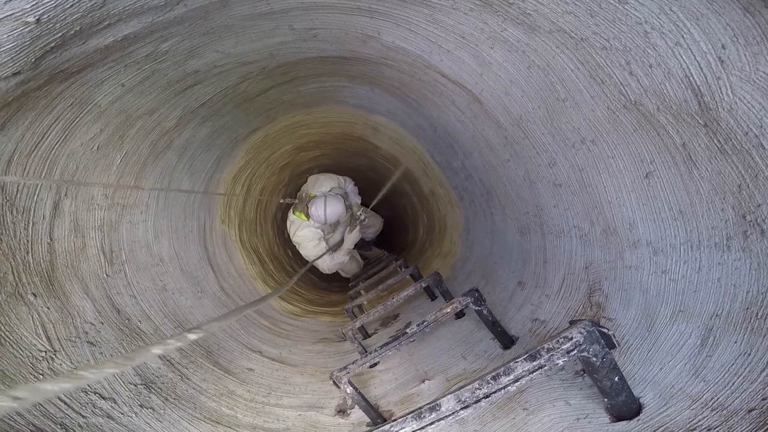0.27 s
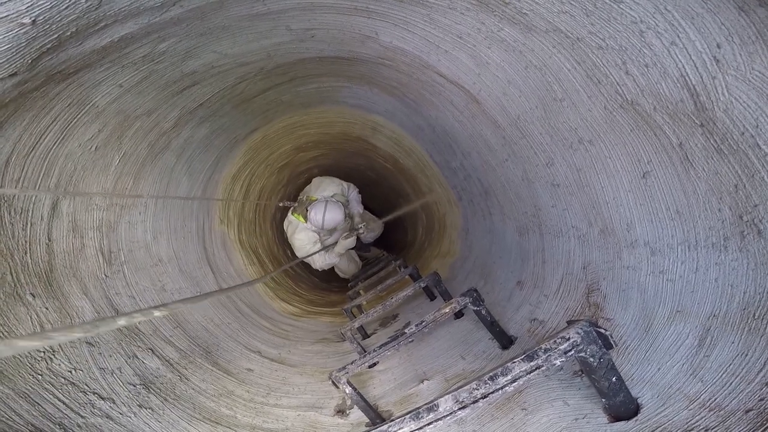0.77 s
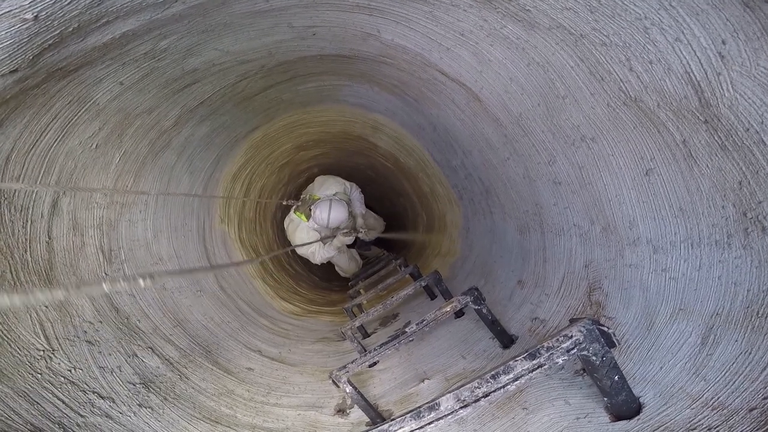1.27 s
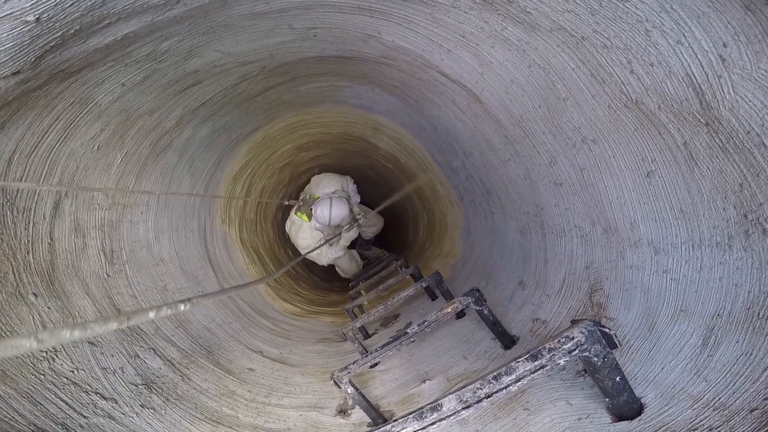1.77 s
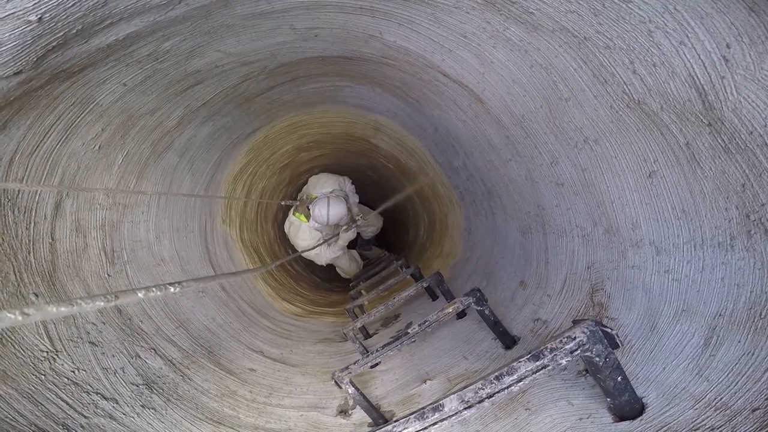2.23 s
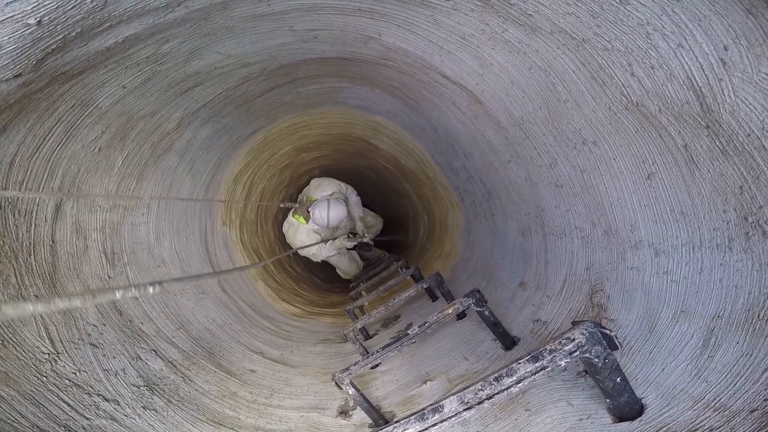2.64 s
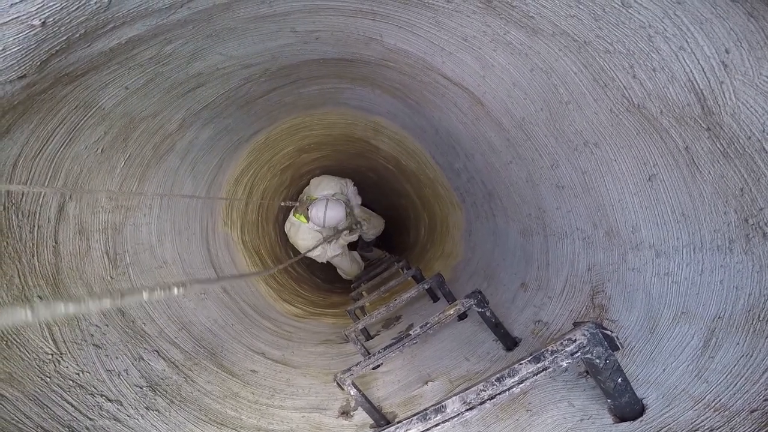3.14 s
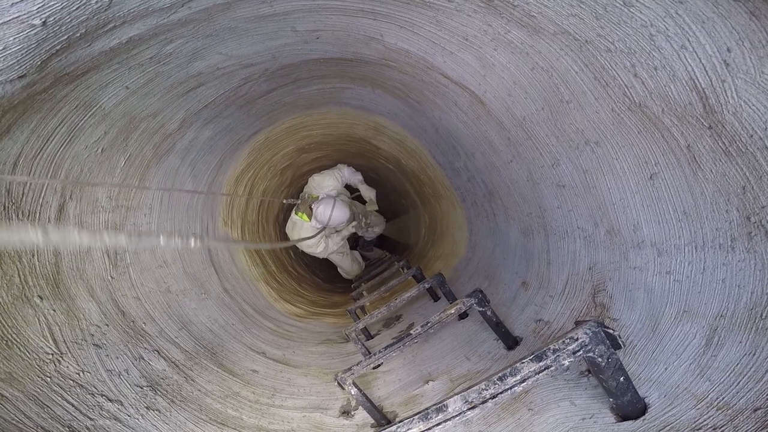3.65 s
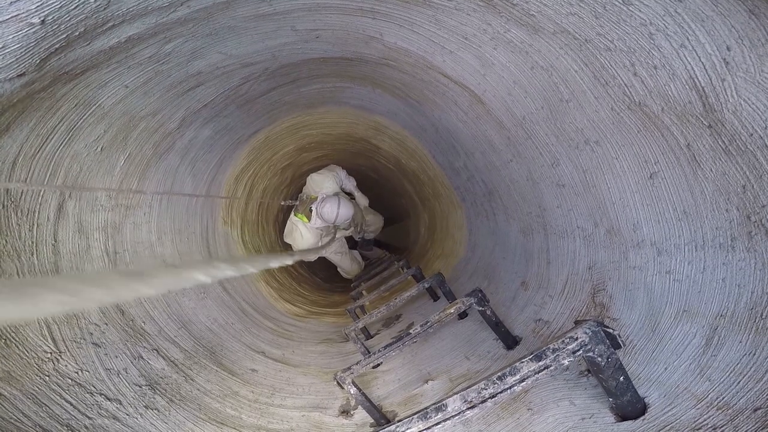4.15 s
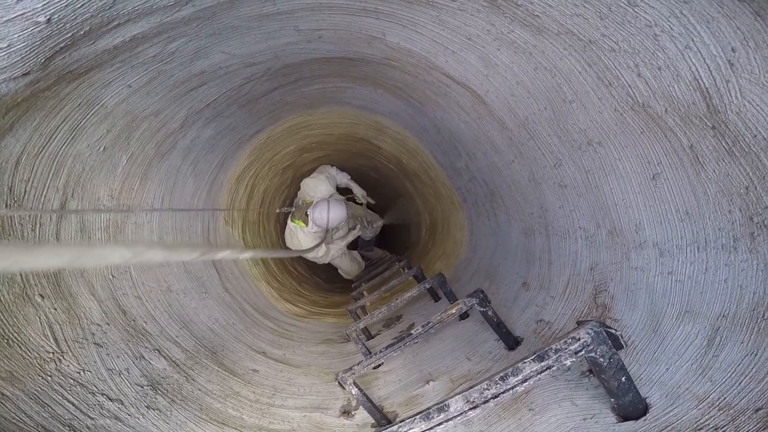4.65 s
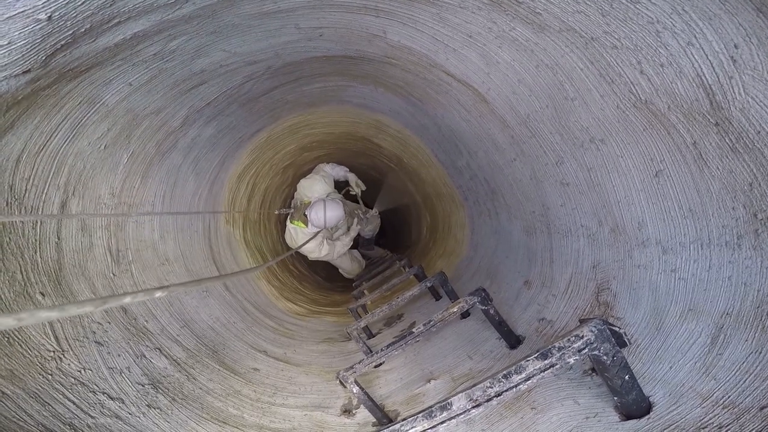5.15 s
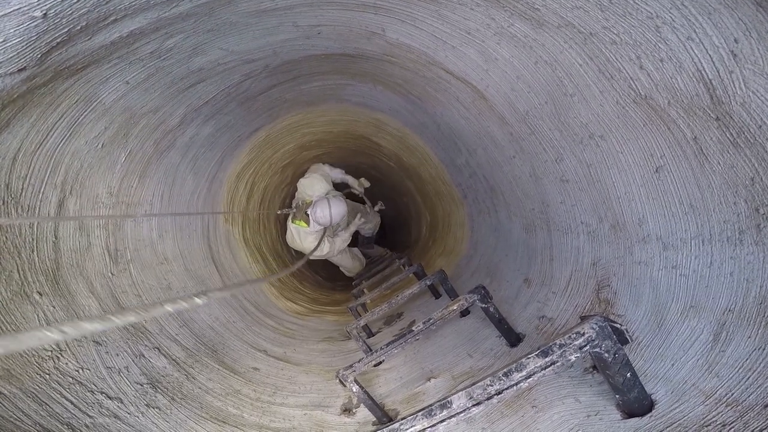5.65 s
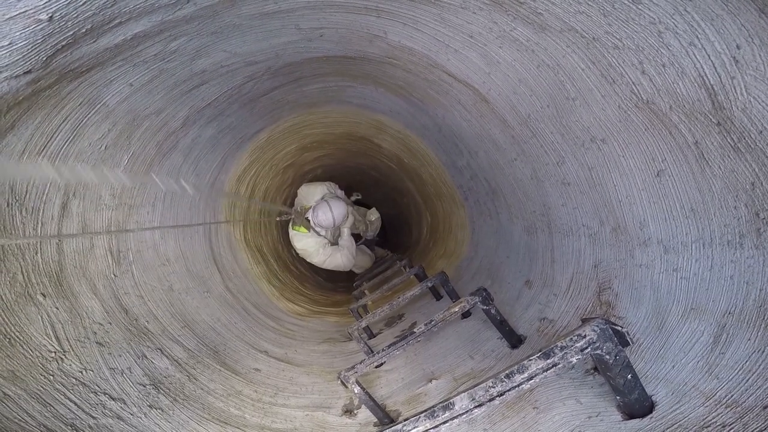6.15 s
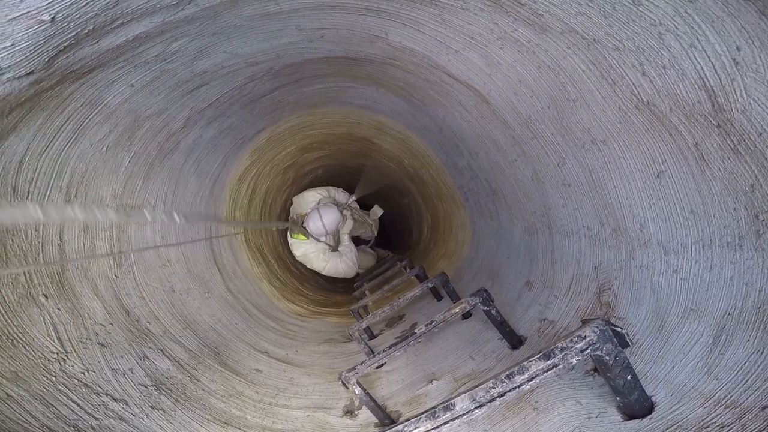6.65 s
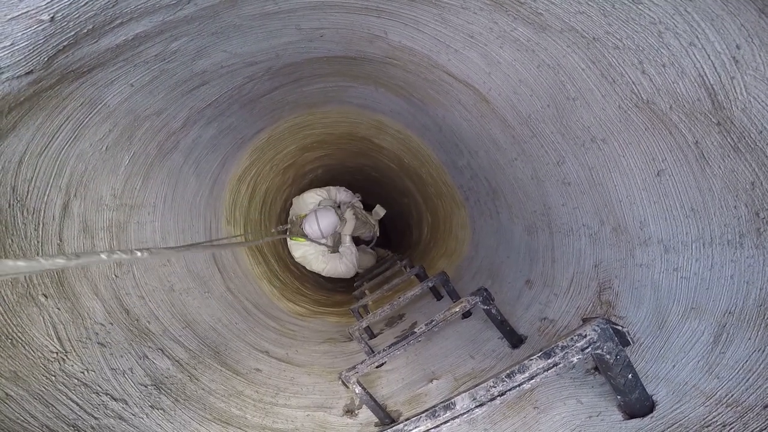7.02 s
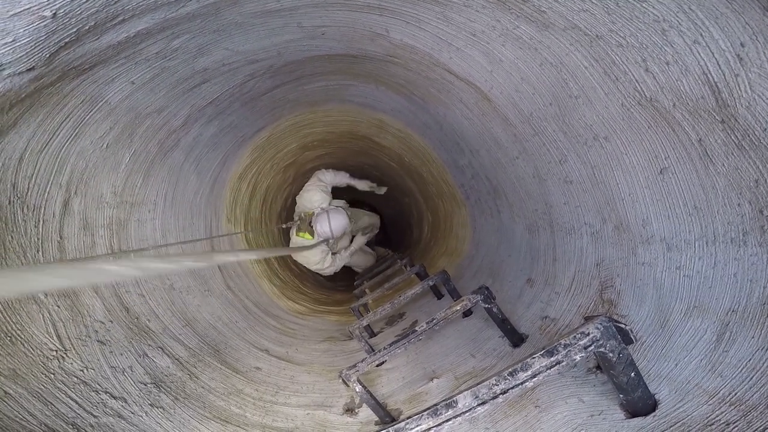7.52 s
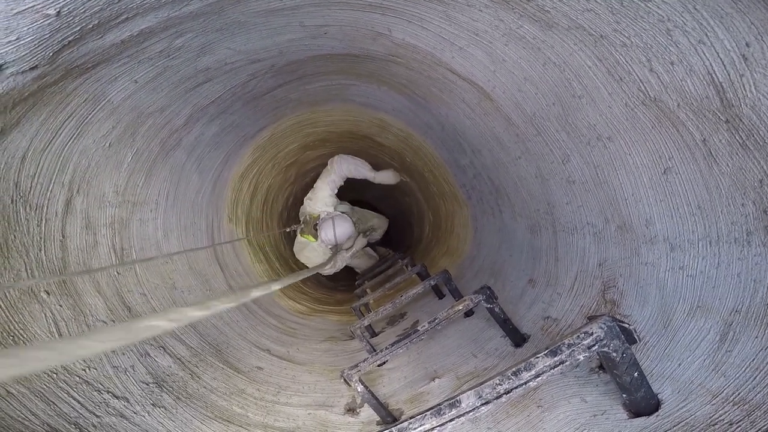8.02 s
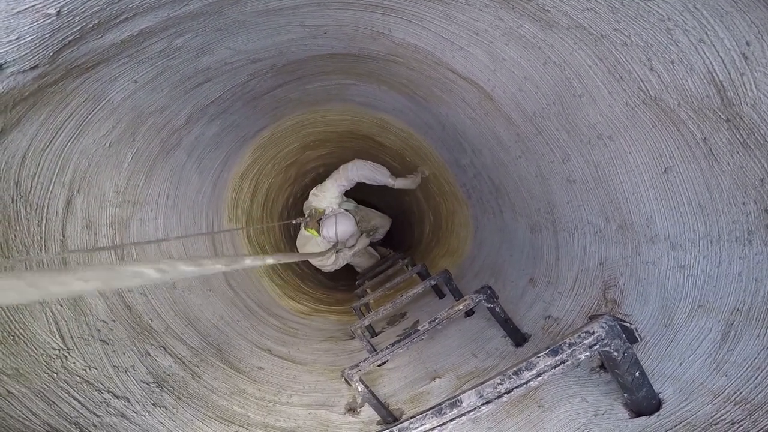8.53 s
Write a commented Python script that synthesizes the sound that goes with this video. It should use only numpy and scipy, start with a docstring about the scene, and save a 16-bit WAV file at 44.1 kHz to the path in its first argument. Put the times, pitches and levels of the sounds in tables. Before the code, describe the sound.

A strong, grainy spray hiss is already running, stops, returns for a brief burst, then a longer one with slight whistling and two dull thumps, and finally a short bright one. Constant faint air leakage fills the pauses. A low engine hum wavers in pitch beneath. Mono sound from above the shaft, close concrete reflections shifting the hiss's colour.

```python
"""Epoxy spraying in a concrete manhole

A worker sprays the manhole wall, heard in mono from the rim: filtered noise hisses in four passes, with
puffs, ticks, brief whistles and a constant thin air leak; drifting echoes of the shaft colour it all.
A nearby generator engine, summed from sine harmonics, drones and sags twice under load.
Below lie outdoor rumble (low noise) and a few dull thumps (decaying sines)."""
import sys
import numpy as np
from scipy import signal
from scipy.fft import rfft, irfft
from scipy.io import wavfile
from scipy.ndimage import uniform_filter1d, map_coordinates

SR = 44100
rng = np.random.default_rng(int(sys.argv[2]) if len(sys.argv) > 2 else 0)


def wrap_up_sound(samples):
    """Save the sound to the file named by the first command line argument, as 16-bit audio."""
    columns = np.atleast_2d(samples).T
    # keep every value between -1 and 1, then stretch to whole-number steps
    tamed = np.clip(columns, -1, 1)
    steps = np.round(tamed * 32767).astype(np.int16)
    wavfile.write(sys.argv[1], SR, steps)


N = 387638
TIME = np.arange(N) / SR
FREQS = np.maximum(np.arange(N // 2 + 1) * SR / N, 1)
TOP_HZ = 15350
# resonances and dips between gun and microphone: centre_hz, width_hz, gain_db
PATH_COLOUR = [(782, 170, 7), (1535, 80, 0.5), (1880, 350, 0.5), (2206, 140, -7), (3010, 243, 5.5),
               (3415, 316, 6.5), (3740, 175, -9.5), (3880, 560, 4.5), (5560, 630, 8), (6586, 1180, 7),
               (10160, 1330, 6.5), (12760, 1370, 6)]


def undb(db):
    """Decibels to gain."""
    return 10 ** (np.asarray(db) / 20)


def unit(x):
    """Scale to rms 1."""
    return x / np.sqrt(np.mean(x ** 2))


def walk(rate_hz):
    """Smooth random control from values redrawn at rate_hz; spread near 1."""
    k = max(int(SR / rate_hz), 2)
    held = np.repeat(rng.standard_normal(N // k + 1), k)
    smooth = uniform_filter1d(uniform_filter1d(held, k), k)
    return 1.343 * smooth[:N]


def swell(centre_s, length_s):
    """Gaussian rise and fall: 1 at its centre, 1/e at length_s either side."""
    return np.exp(-((TIME - centre_s) / length_s) ** 2)


def slope(points):
    """Spectrum in dB at every frequency, interpolated over log frequency."""
    hz, db = np.transpose(points)
    return np.interp(np.log(FREQS), np.log(hz), db)


def bumps(hz, modes):
    """Summed gain in dB of resonances at the given frequencies."""
    return sum(db / (1 + (2 * (hz - centre) / width) ** 2) for centre, width, db in modes)


def shape(x, db):
    """Filter by a gain in dB at every frequency."""
    return irfft(rfft(x) * undb(db), N)


def band(x, lo_hz, hi_hz):
    """The part of a sound between two frequencies."""
    return irfft(rfft(x) * ((FREQS >= lo_hz) & (FREQS < hi_hz)), N)


def noise(db):
    """Noise of rms 1 with the given spectrum."""
    return unit(shape(rng.standard_normal(N), db))


def ring(centre_hz, width_hz):
    """Noise of rms 1 in one steep resonance, with the path colour."""
    detune = (FREQS / centre_hz - centre_hz / FREQS) * centre_hz / width_hz
    return noise(bumps(FREQS, PATH_COLOUR) - 20 * np.log10(1 + detune ** 2))


def wall_echo(x, lag_s, sweep_s, share):
    """The wall returns the jet after a randomly drifting lag: a moving comb."""
    lag_samples = (lag_s + sweep_s * walk(2.2)) * SR
    return x + share * map_coordinates(x, [np.arange(N) - lag_samples], order=3)


def spits(per_s, boost_db, length_s):
    """Resin blobs break up at the nozzle: very short hiss surges, random in time and size."""
    hits = rng.random(N) < per_s / SR
    surges = hits * np.minimum(rng.exponential(size=N), 2.5)
    decay = np.exp(-1 / (length_s * SR))
    return undb(boost_db * signal.lfilter([1], [1, -decay], surges))


def trigger(opening_s, spurt_s, snap_db):
    """Nozzle flow for treble and lower hiss: snaps open with a spurt, bleeds away when shut."""
    # trigger pulls: opens_s, shuts_s, t60_s (after shutting), spurt_db, low_hiss_lift_db
    pulls = [(-0.1, 2.408, .22, 0, 0), (2.7, 3.106, .21, 1, 0), (3.401, 5.578, .35, 3, 0.3),
             (6.241, 6.994, .1, 2, 2)]
    flow = low_flow = 0
    for opens_s, shuts_s, t60_s, spurt_db, lift_db in pulls:
        age_s = np.maximum(TIME - opens_s, 0)
        shut_age_s = np.maximum(TIME - shuts_s, 0)
        surge_db = spurt_db * np.exp(-age_s / spurt_s) + snap_db * swell(opens_s + opening_s, 0.0019)
        pull = np.minimum(age_s / opening_s, 1) * undb(surge_db - 60 * shut_age_s / t60_s)
        flow = flow + pull
        low_flow = low_flow + pull * undb(lift_db)
    return flow, low_flow


def jet(flutter_db, low_flutter_db, high_trim_db):
    """Turbulent hiss of atomised resin: treble follows the aim fully, the coarse lower part less."""
    # treble level as the gun swings towards and away from the opening: time_s, level_db (before trim)
    aim_points = [(.5, -22), (.85, -25), (3.1, -25), (3.45, -22), (4.25, -24), (4.95, -19.5), (6.3, -21.5),
                  (6.65, -20)]
    # jet spectrum before path colour: pitch_hz, relative_density_db (per Hz)
    jet_spectrum = [(200, -38), (500, -30), (1100, -24), (1700, -10.5), (2800, -2), (4800, -1), (8500, 0.5),
                    (15000, -2)]
    reference_aim_db, low_hiss_db, low_follows = -25, -31.5, 0.59
    aim_db = np.interp(TIME, *np.transpose(aim_points))
    low_db = low_hiss_db + low_follows * (aim_db - reference_aim_db)

    hiss = noise(slope(jet_spectrum) + bumps(FREQS, PATH_COLOUR))
    hiss = wall_echo(hiss, lag_s=.0042, sweep_s=0.000276, share=0.057)
    low = unit(band(hiss, 0, 4520)) * undb(low_db + low_flutter_db * walk(45))
    # treble is beamed at the nearest wall: shorter lag, stronger echo
    high = wall_echo(band(hiss, 4500, TOP_HZ), lag_s=.0011, sweep_s=.00007, share=.15)
    high = unit(high) * undb(aim_db + high_trim_db)
    high = high * spits(per_s=12, boost_db=4.5, length_s=0.0017)

    flow, low_flow = trigger(opening_s=0.0062, spurt_s=0.035, snap_db=1)
    return (low * low_flow + high * flow) * undb(flutter_db * walk(110))


def leak(flicker_db):
    """Air escapes constantly, trigger pulled or not; at times it swells or brightens."""
    # swells: centre_s, length_s (centre to 1/e), rise_db, extra_treble_rise_db
    leak_swells = [(.3, 1.1, 7.5, 0), (3.3, 0.17, 2, 3.5), (5.954, 0.14, 4, 6.5), (8.0, 0.15, 0, 5)]
    # leak spectrum before path colour: pitch_hz, relative_density_db (per Hz)
    leak_spectrum = [(400, -16.5), (1100, -7), (1700, 1), (2800, 0.5), (4800, -11), (8500, -21),
                     (15000, -28.5)]
    level_db, treble_db = -52.5, -16  # treble relative to the lower band
    for centre_s, length_s, rise_db, treble_rise_db in leak_swells:
        level_db = level_db + rise_db * swell(centre_s, length_s)
        treble_db = treble_db + treble_rise_db * swell(centre_s, length_s)
    air = noise(slope(leak_spectrum) + bumps(FREQS, PATH_COLOUR))
    air = unit(band(air, 0, 7640)) + unit(band(air, 7570, TOP_HZ)) * undb(treble_db)
    return air * undb(level_db + flicker_db * walk(25))


def shaft(x, wet_db, sweep_hz):
    """Direct sound plus concrete shaft reverberation, its echo pattern turning as the gun moves."""
    t60_s, split_hz = .28, 6500
    t = TIME[:SR // 2]
    low_pass = signal.butter(2, split_hz, fs=SR)
    high_pass = signal.butter(2, split_hz, "high", fs=SR)
    turn = 2 * np.pi * np.cumsum(sweep_hz * undb(2.92 * walk(2.01))) / SR
    wet = 0
    for aim in range(4):
        low, high = rng.standard_normal((2, len(t)))
        tail = signal.lfilter(*low_pass, low) * undb(-60 * t / t60_s)
        # treble dies sooner
        tail += signal.lfilter(*high_pass, high) * undb(-60 * t / (0.68 * t60_s))
        # two quadrature pairs of patterns: constant total power
        share = np.cos(turn * np.sqrt(1 + aim // 2) + aim * np.pi / 2) / np.sqrt(2)
        wet = wet + signal.fftconvolve(x * share, tail / np.linalg.norm(tail))[:N]
    return (x + undb(wet_db) * wet) / np.sqrt(1 + undb(2 * wet_db))


def felt_load(response_s):
    """Load, 0-1, as felt by a part with a first-order lag."""
    # engine loads: on_s, off_s
    loads = [(-.02, .993), (4.716, 5.962)]

    def remaining(start_s):
        return np.exp(-np.maximum(TIME - start_s, 0) / response_s)

    return sum(remaining(off_s) - remaining(on_s) for on_s, off_s in loads)


def harmonics(base_hz, table, load, waver_db):
    """Sine lines of a turning part: shift with load, swell as they cross air column modes."""
    # shaft air column modes: centre_hz, width_hz, gain_db
    column_modes = [(70, 8, 3.5), (116.5, 7, 13), (243.5, 5, 5), (247, 2.5, -12), (371, 6, 8)]
    phase = 2 * np.pi * np.cumsum(base_hz * (1 + 0.00095 * walk(12))) / SR
    out = 0
    for multiple, db, load_db in table:
        k = round(multiple)
        mode_db = bumps(k * base_hz, column_modes)
        gain = undb(db + load * load_db + mode_db + waver_db * walk(9))
        out = out + gain * np.sqrt(2) * np.sin(k * phase + rng.uniform(0, 2 * np.pi))
    return out


def generator():
    """Load slows the engine; the governor responds late, so it races briefly when load drops off."""
    # engine lines: cycle_multiple (5 = firing rate), relative_level_db, full_load_change_db
    engine_orders = [(3, -21, 6), (5, 0.5, 1.5), (6, -25, -3), (7, -14, -2.5), (8, -15.5, -1),
                     (9, -16, -4.5), (10, -21, 4.5), (11, -16, -6), (13, -31, 2), (14, -31, -14),
                     (15, -35.5, 12), (18, -30.5, -5), (21, -43, -10), (29, -32.5, -2), (36, -35, -5),
                     (38, -46.5, 15)]
    # hum of a belt-driven part: harmonic, relative_level_db, full_load_change_db
    hum_harmonics = [(2, -15.8, -13), (3, -29.5, -9), (4, -32, -12), (6, -34.5, -0.5)]
    free_hz, sag_hz, governor_hz = 74.77, 7.72, 8.86  # firing rate: unloaded, lost to load, won back
    belt_ratio = 1.582  # hum fundamental / firing rate
    engine_db, load_rise_db = -41, 4.5
    racing_rise_db, racing_hz = 3.5, 1.63  # limit of the rise, excess speed scale

    load = felt_load(response_s=.24)  # flywheel
    throttle = felt_load(response_s=.97)  # governor
    firing_hz = free_hz - sag_hz * load + governor_hz * throttle
    engine = harmonics(firing_hz / 5, engine_orders, load, waver_db=1.53)
    hum = harmonics(belt_ratio * firing_hz, hum_harmonics, load, waver_db=1.9)
    racing_db = racing_rise_db * np.tanh(np.maximum(firing_hz - free_hz, 0) / racing_hz)
    return (engine + hum) * undb(engine_db + load_rise_db * load + racing_db)


def rumble(level_db, swell_db):
    """Low outdoor noise with slow random swells."""
    # rumble spectrum: pitch_hz, relative_density_db (per Hz)
    rumble_spectrum = [(5, -25), (18, -5), (30, 3), (55, 0), (100, -4), (150, -7.5), (200, -13.5),
                       (320, -23), (550, -25.5), (800, -29.5), (1300, -33), (4000, -61)]
    return noise(slope(rumble_spectrum)) * undb(level_db + swell_db * walk(2.76))


def puffs_and_ticks():
    """Puffs and ticks of the gun, during and between passes: resonant noise, quick rise, slower decay."""
    # puffs and ticks: start_s, level_db, rise_s, t60_s, centre_hz, width_hz
    puff_tick_events = [(.465, -34, .03, .45, 1970, 700), (3.305, -42, .002, .05, 4300, 5500),
                        (3.778, -33.5, .03, .7, 1970, 900), (4.79, -34, .005, .07, 2000, 400),
                        (5.55, -34.5, .03, .58, 1880, 900), (5.61, -35, .05, .3, 3000, 1500)]
    out = 0
    for start_s, level_db, rise_s, t60_s, centre_hz, width_hz in puff_tick_events:
        age_s = np.maximum(TIME - start_s, 0)
        decay_db = -60 * np.maximum(age_s - rise_s, 0) / t60_s
        burst = ring(centre_hz, width_hz) * np.minimum(age_s / rise_s, 1)
        out = out + burst * undb(level_db + decay_db)
    return out


def whistle():
    """The hiss sharpens at set times: a narrow noise resonance swells and fades."""
    # whistles: centre_s, length_s (centre to 1/e), level_db
    whistle_events = [(4.282, 0.26, -31), (5.395, .2, -36), (6.537, 0.077, -30), (6.74, 0.095, -29)]
    level = sum(undb(db) * swell(centre_s, length_s) for centre_s, length_s, db in whistle_events)
    return level * ring(centre_hz=5520, width_hz=620)


def thumps():
    """Dull low knocks: sines with a soft onset and a fast exponential decay."""
    # thumps: start_s, level_db (before onset softening), pitch_hz, t60_s
    thump_events = [(4.319, -21, 42, .12), (4.323, -25, 75, .15), (4.437, -25, 45, .08),
                    (4.441, -29, 90, .12)]
    out = 0
    for start_s, level_db, pitch_hz, t60_s in thump_events:
        age_s = np.maximum(TIME - start_s, 0)
        onset = 1 - np.exp(-age_s / 0.0034)
        out = out + undb(level_db - 60 * age_s / t60_s) * np.sin(2 * np.pi * pitch_hz * age_s) * onset
    return out


def scene():
    """Gun and air in the shaft over the engine; both channels identical."""
    gun = jet(flutter_db=0.52, low_flutter_db=0.96, high_trim_db=-1.52)
    gun = gun + leak(flicker_db=0.4) + puffs_and_ticks() + whistle()
    gun = shaft(gun, wet_db=-7, sweep_hz=1.1)
    mono = gun + generator() + rumble(level_db=-43.0, swell_db=-0.5) + thumps()
    return np.array([mono, mono])


def record(dry):
    """Steep elliptic low-pass at TOP_HZ."""
    low_pass = signal.ellip(12, .1, 80, TOP_HZ, fs=SR, output="sos")
    return signal.sosfilt(low_pass, dry)


dry = scene()
out = record(dry)
wrap_up_sound(out)
```